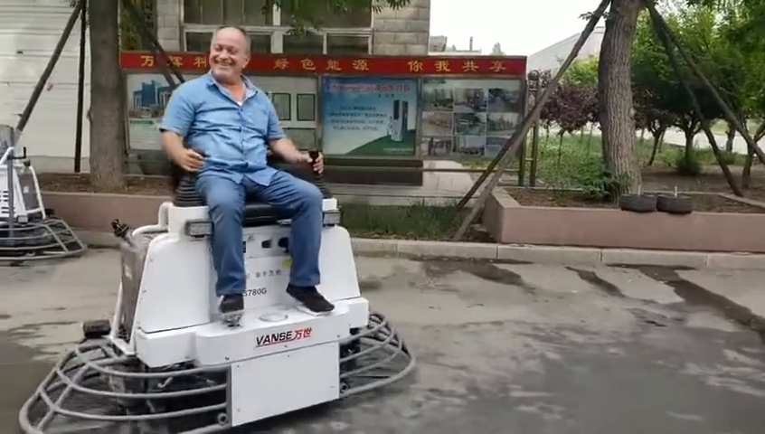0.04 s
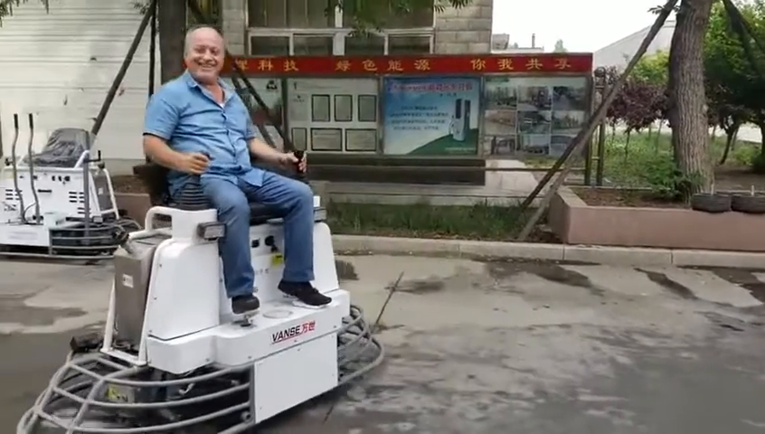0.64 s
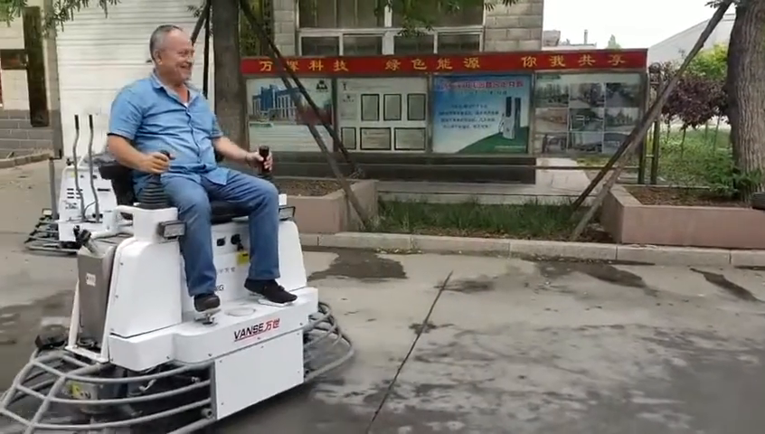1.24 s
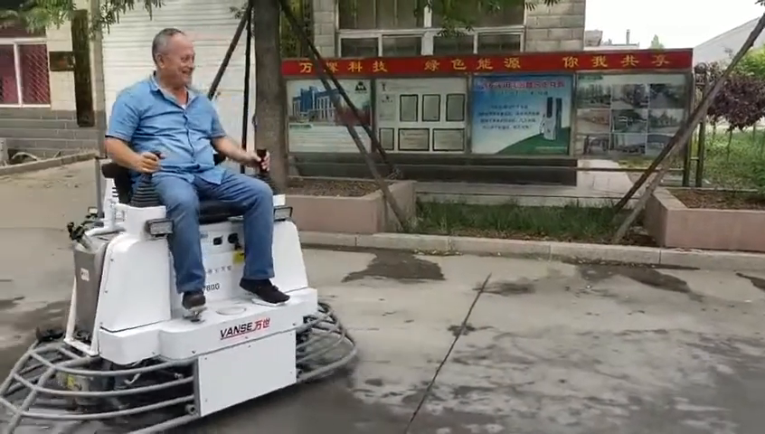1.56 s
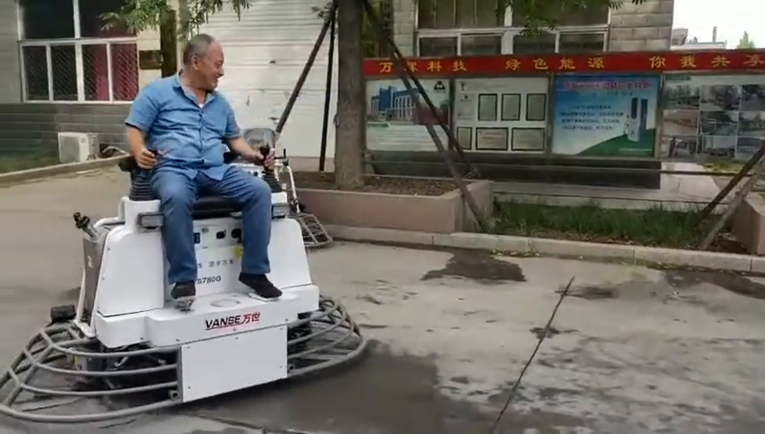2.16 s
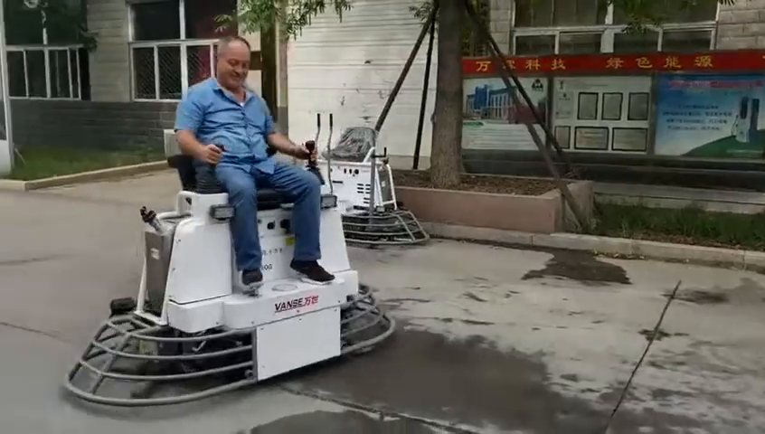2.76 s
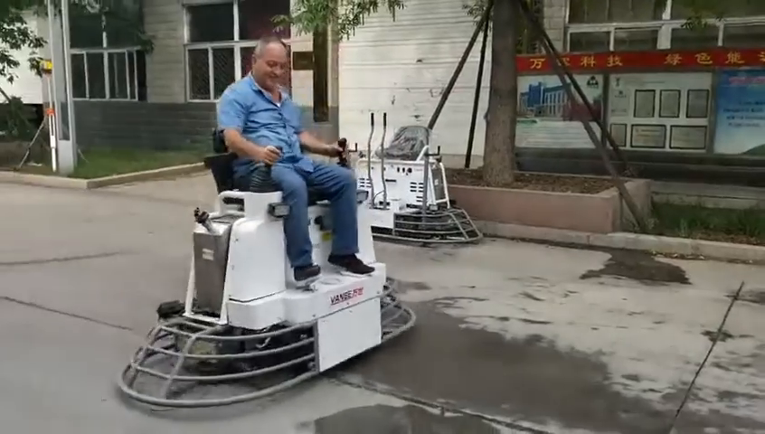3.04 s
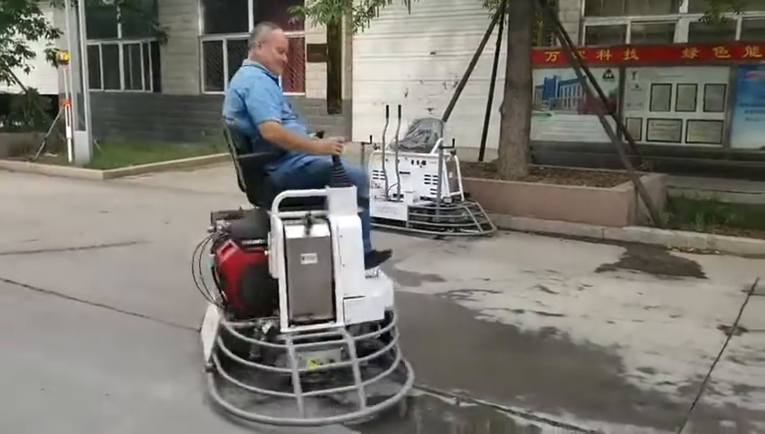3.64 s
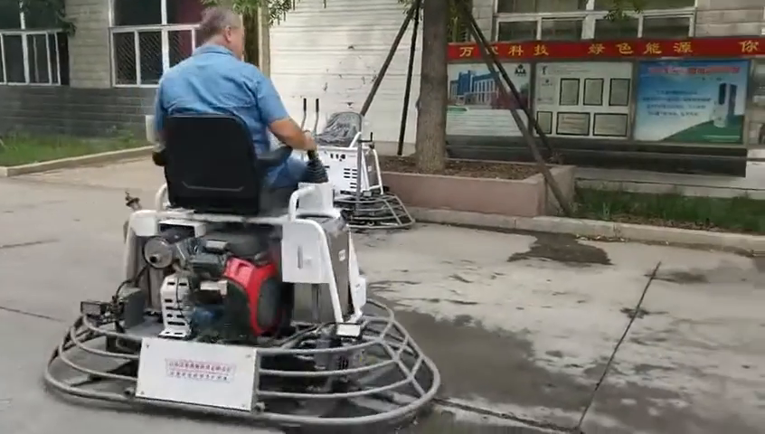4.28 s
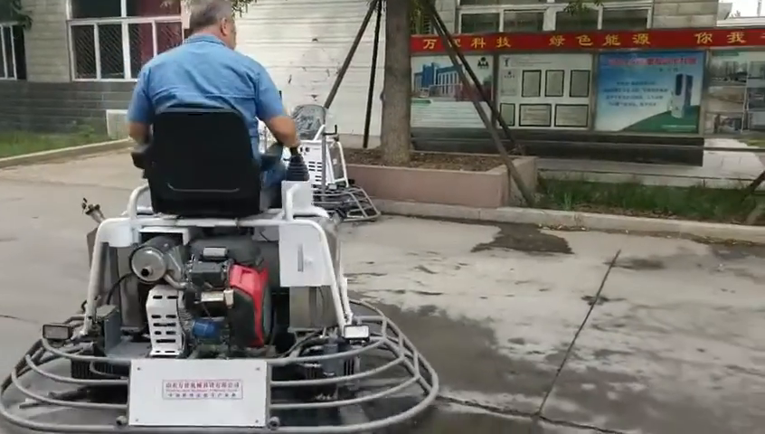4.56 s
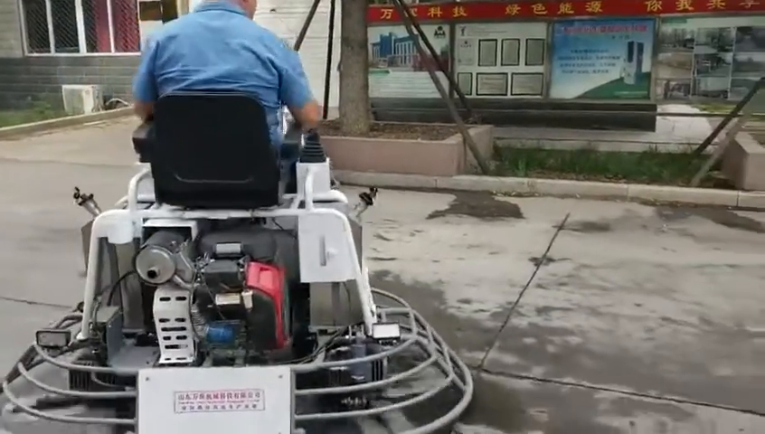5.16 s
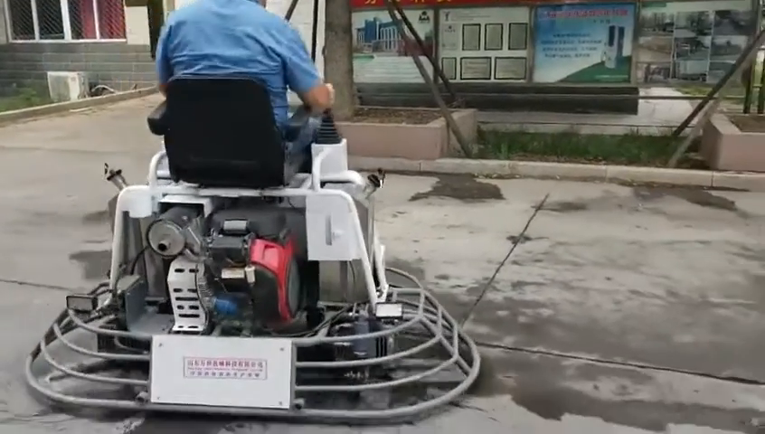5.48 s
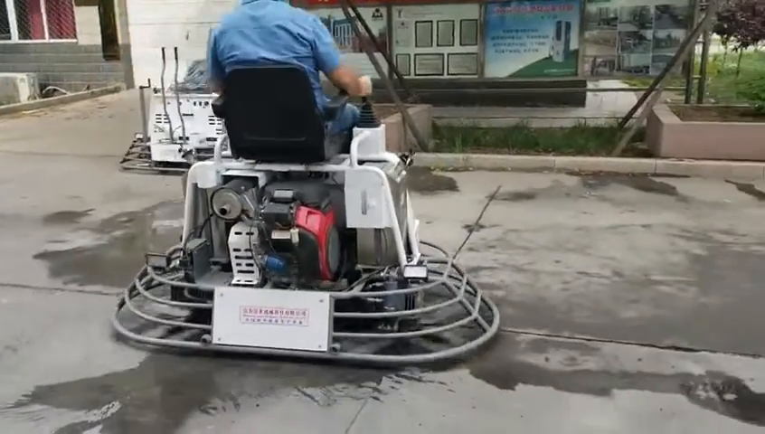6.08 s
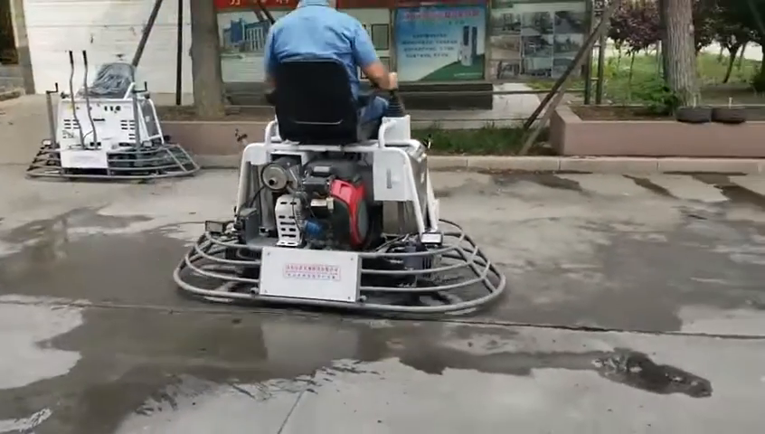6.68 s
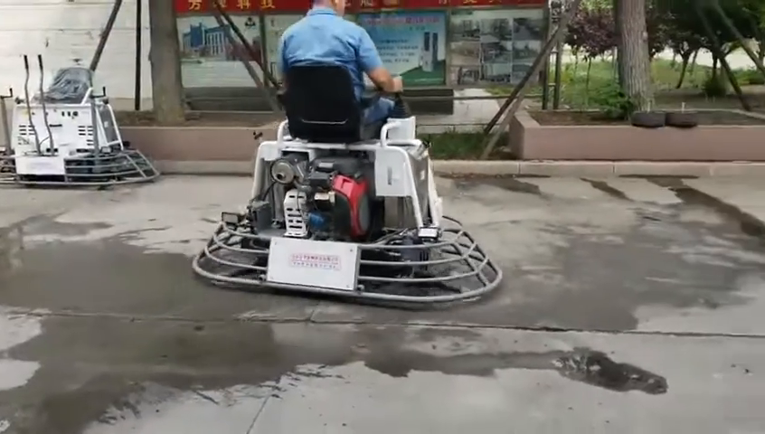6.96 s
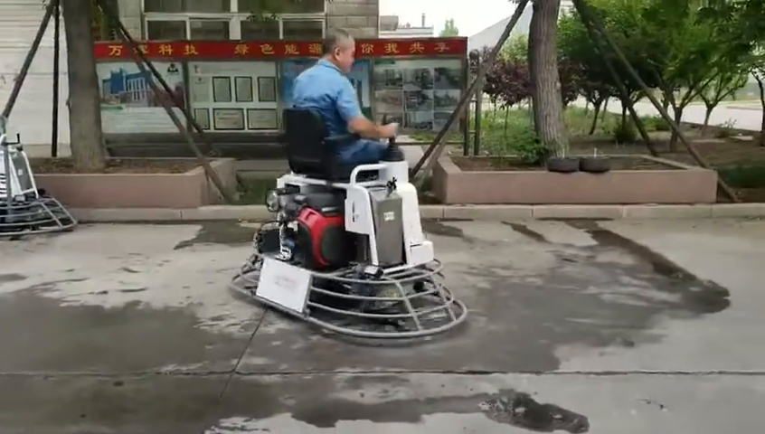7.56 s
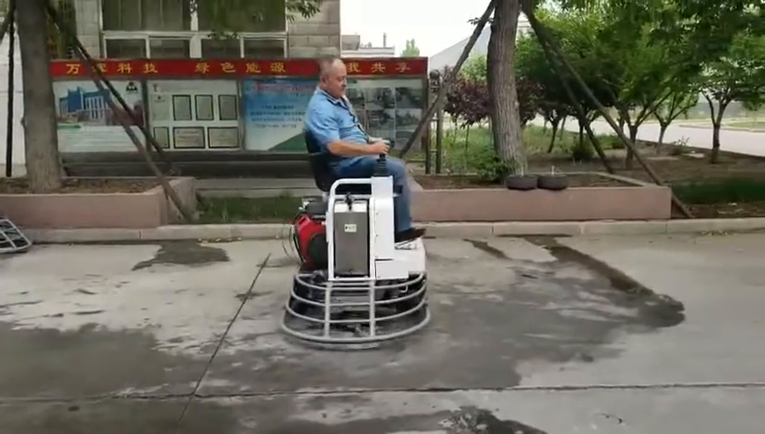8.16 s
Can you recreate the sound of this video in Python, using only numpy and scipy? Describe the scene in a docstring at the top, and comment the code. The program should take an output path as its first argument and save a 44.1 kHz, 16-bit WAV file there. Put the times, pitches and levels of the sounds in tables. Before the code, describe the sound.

Steel trowel blades grind across a concrete slab with short metallic scrapes, over a throbbing petrol engine that sags briefly under load.

```python
"""Power trowel on damp concrete

A ride-on trowel circles in a yard, a few metres away. Its V-twin petrol engine fires unevenly
into a muffler, sounding harmonics of the engine cycle that sag in pitch under load. Friction
of steel blades on the slab makes a hiss whose colour turns with the machine, and catches on
grit and joints ring the blades. Valve gear clatters behind, over a low rush of fan and frame."""
import sys
import numpy as np
from scipy import signal
from scipy.fft import rfft, irfft
from scipy.io import wavfile

SR = 44100
rng = np.random.default_rng(int(sys.argv[2]) if len(sys.argv) > 2 else 0)


def dump_mix(stems):
    """Bounce the given channels to the path in sys.argv[1] as a 16-bit WAV at rate SR."""
    frames = np.atleast_2d(stems).T  # one column per channel
    limited = np.clip(frames, -1, 1)  # hard clip at full scale
    pcm = np.round(limited * 32767).astype(np.int16)
    wavfile.write(sys.argv[1], SR, pcm)


N = 366912

FIRING_PHASES, BARK_LAG = (.545, 0.1959), 0.0883  # two cylinders, tailpipe delay; in cycles
# Muffler thud, shell drone and tailpipe bark: engine_order, relative_db
THUD_ORDERS = [(2, -2.5), (3, 0), (4, -2)]
DRONE_ORDERS = [(7, -14), (8, 0), (9, -8)]
BARK_ORDERS = [(10, -3.5), (11, -2.5), (12, -10), (13, -1.5), (14, -4), (15, -6.5), (16, -9.5), (17, -17),
               (18, -15)]
# Exhaust as the machine moves: time_s, thud_db, fifth_db, sixth_db, drone_db, bark_db, gas_db
EXHAUST_LEVELS = [(.25, -29, -25, -28, -32.5, -29, -40), (.85, -29.5, -28.5, -25.5, -25.5, -29.5, -37.5),
                  (1.3, -30, -29.5, -27.5, -29.5, -30, -33.5), (1.75, -31.5, -26, -26.5, -32.5, -29.5, -37),
                  (2.25, -31.5, -26, -31.5, -33, -32, -45), (2.75, -33.5, -27.5, -30, -31.5, -30, -45),
                  (3.25, -35.5, -34.5, -27, -34, -30.5, -44), (3.75, -32, -30, -25.5, -32.5, -34.5, -41),
                  (4.25, -34, -29, -30, -33, -42, -41), (4.75, -33, -29.5, -31, -31, -46, -47),
                  (5.15, -35, -29.5, -34, -36, -49, -45), (5.4, -36, -28.5, -30, -36, -43, -44),
                  (5.9, -36.5, -28, -28.5, -30.5, -40, -47), (6.3, -35.5, -28, -30.5, -37.5, -47, -48),
                  (6.75, -38.5, -30.5, -30, -34, -42, -40), (7.25, -36, -32, -31.5, -37, -41.5, -51),
                  (7.8, -39, -33.5, -29.5, -38, -33, -41), (8.3, -41, -31, -34, -42, -33, -43)]


def exhaust(cycle):
    """Periodic excitation: uneven firings drive a muffler at harmonics of the cycle and puff out gas."""
    thud = engine_orders(cycle, THUD_ORDERS, second_db=-3, wander_db=.7, slip_rad=.15)
    fifth = engine_orders(cycle, [(5, 0)], second_db=-3, wander_db=.3, slip_rad=.08)
    sixth = engine_orders(cycle, [(6, 0)], second_db=-3, wander_db=.3, slip_rad=.08)
    drone = engine_orders(cycle, DRONE_ORDERS, second_db=-1.5, wander_db=.5, slip_rad=.12)
    bark = engine_orders(cycle - BARK_LAG, BARK_ORDERS, second_db=-3, wander_db=1.1, slip_rad=.12)
    # The pipe's resonance lifts whichever order passes through it.
    bark = unit(bark + undb(.5) * resonate(bark, hz=257, stage_width_hz=38))
    puffs = 1 + .4 * np.cos(2 * np.pi * (cycle - np.mean(FIRING_PHASES) - BARK_LAG))
    gas = unit(puffs * resonate(rng.standard_normal(N), hz=297, stage_width_hz=207))
    parts = thud, fifth, sixth, drone, bark, gas
    return sum(undb(db) * part for db, part in zip(curves(EXHAUST_LEVELS), parts))


def engine_orders(cycle, orders, second_db, wander_db, slip_rad):
    """Superposition: two firings set each harmonic's phase; level and phase drift as the machine moves."""
    out = 0
    for order, db in orders:
        first, second = np.exp(-2j * np.pi * order * np.array(FIRING_PHASES))
        phase = 2 * np.pi * order * cycle + np.angle(first + undb(second_db) * second)
        phase += slip_rad * drift(2)
        level_db = db + wander_db * drift(2.01) + 1.05 * drift(14)
        out -= undb(level_db) * np.cos(phase)
    return unit(out)


HEADINGS_DEG = (0, 45, 90, 180)
# Hiss spectrum radiated at each of these headings: frequency_hz, relative_db
FRONT_SPECTRUM = [(710, -19), (1200, -9), (1450, -5.5), (1800, -2), (1990, -10), (2150, -2.5), (2550, 2),
                  (3000, -1.5), (3300, 1.5), (3550, -5), (3750, 0.5), (4400, 1.5), (5300, 0), (5800, -0.5),
                  (6500, -1), (7300, -2.5), (8000, -6.5), (9000, -16.5), (9600, -25)]
OBLIQUE_SPECTRUM = [(710, -26), (1250, -18), (1650, -3.5), (1990, -5), (2200, 1.5), (2420, 2.5),
                    (2720, -2.5), (3180, 2), (3490, -7), (3800, 4), (4100, -2), (4450, 3), (5000, 0.5),
                    (5550, -1), (6400, 2), (7100, -4), (7500, -6.5), (8600, -8), (9100, -16), (9600, -26)]
SIDE_SPECTRUM = [(710, -21.5), (1200, -4), (1620, 0.5), (1890, -3.5), (2150, 4), (2400, 0), (2620, -3.5),
                 (2900, 3), (3230, -5.5), (3650, 1.5), (3900, -1), (4300, 1.5), (5000, -4.5), (5500, -7),
                 (6100, -3), (7200, -9), (8100, -5), (9000, -11.5), (9600, -26.5)]
REAR_SPECTRUM = [(710, -20), (1350, -12.5), (1620, -4.5), (1980, -6), (2200, 1.5), (2480, 4), (2750, -0.5),
                 (3100, 1.5), (3450, -3.5), (3900, 1), (4250, 2), (4600, 4), (5100, 4), (5900, 1),
                 (6450, 1.5), (7300, -6), (8000, -5), (8800, -21.5), (9200, -34.5), (9600, -43.5)]


def blade_hiss(sweep, heading_shares):
    """Friction noise: blades grind grit and crack sand; directivity colours the grinding by heading."""
    grit = steel_modes(grains(per_s=5000, spread_db=0) * sweep)
    sand = unit(resonate(grains(per_s=260, spread_db=3.5), hz=6500, stage_width_hz=4500))
    views = zip(heading_shares, (FRONT_SPECTRUM, OBLIQUE_SPECTRUM, SIDE_SPECTRUM, REAR_SPECTRUM))
    grinding = sum(share * unit(colour(grit, spectrum, causal=0)) for share, spectrum in views)
    return grinding + undb(-21) * sand


def steel_modes(friction, count=56, q=50, flicker_db=6.5):
    """Modal response: resonances of the guard and blades flare in the hiss, each on its own."""
    out = friction
    for hz in np.geomspace(1500, 9300, count) * (1 + .006 * rng.standard_normal(count)):
        mode = bandpass(friction, hz, hz / q)
        out = out + undb(flicker_db * np.clip(drift(28), -1.6, 1.6)) * mode
    return unit(out)


def rotor_sizzle(sweep):
    """Level difference between the ears: the nearer rotor's bright edge hiss is heard to the left."""
    friction = grains(per_s=4300, spread_db=3) * sweep
    edge = unit(resonate(friction, hz=6600, stage_width_hz=1100))
    return edge * undb([[0], [-18]])


# A blade's low ring, its rasp and the hiss of its edge: pitch_hz, width_hz, relative_db
RING_MODES = [(690, 90, 9), (885, 115, 15), (1030, 75, 10)]
RASP_MODES = [(1700, 200, 3.1), (2450, 210, 7.5), (2790, 520, 2.9)]
EDGE_MODES = [(3815, 200, 4.5), (4490, 440, 4.5), (4900, 450, 2.5), (6210, 550, 4)]
# Hard catches on grit and joints: time_s, length_s, ring_db, rasp_db, edge_db
HARD_CATCHES = [(1.49, 0.05, -28, -46, -23), (2.122, 0.021, -22, -23, -18.5), (2.181, .025, -31, -27, -20),
                (2.999, .04, -27, -22, -29), (3.244, .012, -18.5, -21, -34),
                (3.629, 0.042, -23.5, -22, -26), (3.693, 0.039, -39, -24, -21.5),
                (3.78, 0.028, -24, -16, -20), (3.991, 0.033, -26, -14.5, -24),
                (4.085, 0.037, -19.5, -16.5, -19.5), (4.202, 0.03, -23, -30, -24),
                (4.484, 0.022, -20, -20, -34), (4.58, .05, -27, -23.5, -33),
                (4.629, 0.0067, -16.5, -20.5, -24), (4.83, 0.023, -33, -30, -28),
                (4.93, .025, -26, -25, -24), (5.066, 0.009, -16.5, -17, -25), (5.145, 0.03, -32, -29, -19),
                (5.194, 0.065, -26, -22, -23), (5.268, 0.06, -27, -31, -26), (5.342, 0.04, -21, -18.5, -21),
                (5.475, 0.055, -32, -20.5, -21.5), (5.603, 0.022, -20, -20, -32),
                (5.711, 0.024, -21, -18, -17.5), (5.754, .03, -28, -28, -25),
                (5.802, 0.045, -31, -21.5, -16.5), (5.854, 0.051, -23.5, -20, -25),
                (6.024, 0.0073, -20, -15.5, -40), (6.088, 0.045, -29, -37, -32),
                (6.209, 0.036, -23.5, -25, -18), (6.469, 0.02, -23.5, -19, -22),
                (6.675, 0.013, -26, -27, -24), (6.802, 0.014, -27, -31, -31), (7.033, 0.06, -30, -25, -36),
                (7.376, 0.038, -24.5, -23, -27), (7.442, 0.028, -23, -23, -36),
                (7.819, 0.013, -15, -22, -19), (7.902, 0.04, -22, -25, -24), (8.082, 0.071, -33, -32, -22),
                (8.192, 0.036, -26, -22, -22)]


def blade_catches(events, detune=.045, spread_db=2.5, tail_s=.028, tail_db=-15):
    """Transient excitation: a rough spot rings a blade, its modes varying with the point of contact."""
    t = np.arange(N) / SR
    out = np.zeros(N)
    for time_s, length_s, *levels_db in events:
        near = slice(max(int((time_s - .06) * SR), 0), int((time_s + .14) * SR))
        age = t[near] - time_s + .0045
        slope_s = length_s * np.where(age < 0, .21, .48)  # quick rise, slower fall
        swell = np.exp(-(age / slope_s) ** 2)
        power = swell + undb(2 * tail_db) * (age > 0) * np.exp(-abs(age) / tail_s)
        for modes, db in zip((RING_MODES, RASP_MODES, EDGE_MODES), levels_db):
            tuned = [(hz * (1 + detune * rng.uniform(-1.18, 1)), width_hz,
                      mode_db + spread_db * rng.standard_normal()) for hz, width_hz, mode_db in modes]
            scrape = np.sqrt(power) * grains(per_s=5000, spread_db=-.5, size=len(age))
            out[near] += undb(db) * np.sqrt(power.mean()) * unit(ring(scrape, tuned))
    return out


def blade_grazes(turns, level_db, blades, length_s=.027, jitter=.17, clearance_s=.065):
    """Blade-passing rate: each pass adds a light catch to a list, unless a hard catch is close."""
    passes = blades * turns
    count = int(passes[-1])
    chance = rng.standard_normal((256, 5))[:count]
    timing, strength, tint = chance[:, 0], chance[:, 1], chance[:, 2:]
    samples = np.searchsorted(passes, np.arange(count) + .5 + jitter * timing).clip(0, N - 1)
    strength_db = level_db[samples] - 2 * np.minimum(strength, 2)
    colour_db = np.array([-4, -2, -1]) + (9 * tint).clip(-2, 2)  # ring, rasp, edge
    levels_db = strength_db[:, None] + colour_db
    hard_s = np.array(HARD_CATCHES)[:, 0]
    return [(time_s, length_s, *row) for time_s, row in zip(samples / SR, levels_db)
            if abs(hard_s - time_s).min() > clearance_s]


# Crankcase and covers: pitch_hz, width_hz, relative_db
CASING_MODES = [(676, 110, -4), (885, 270, 6.5), (918, 100, 0), (1605, 170, -3)]


def valve_clatter(cycle):
    """Forced vibration: valve gear strikes the casing in a pattern that partly repeats every cycle."""
    pattern = rng.standard_normal(2048)
    repeating = pattern[(cycle % 1 * len(pattern)).astype(int)]
    blows = repeating + grains(per_s=1500, spread_db=3)
    throb = 1 + .074 * np.cos(2 * np.pi * (cycle - .22))
    blows *= throb * undb(2 * drift(25))
    return unit(ring(blows, CASING_MODES))


# Low rush of fan and frame: frequency_hz, relative_db
FAN_SPECTRUM = [(20, -12), (60, -8.5), (150, -2.5), (260, -4.5), (380, -3), (500, -12.5), (700, -1),
                (1200, -8.5), (1700, -11), (2600, -48.5)]


def fan_rush():
    """Broadband noise: fan and frame give a low rush without pitch."""
    return unit(colour(rng.standard_normal(N), FAN_SPECTRUM))


def hollow_notch(x, depth=.75):
    """Band rejection: a fixed notch near 2 kHz gives the machine noise a hollow colour."""
    return x - depth * bandpass(x, hz=1985, width_hz=175)


# Side signal relative to mid: frequency_hz, level_db
SIDE_OVER_MID = [(60, -32.5), (190, -38), (330, -14.5), (580, -10.5), (900, -15), (1300, -0.5),
                 (1700, -10.5), (2400, -11.5), (3210, 0.5), (5670, 0), (10000, 1)]


def stereo(mid, other):
    """Decorrelation: bass is alike in both channels, treble is not."""
    side = colour(other, SIDE_OVER_MID)
    return np.array([mid + side, mid - side])


def ring(x, modes):
    """Modal superposition: a body responds as the sum of a few broad resonances."""
    return sum(undb(db) * resonate(x, hz, 1.41 * width_hz) for hz, width_hz, db in modes)


def resonate(x, hz, stage_width_hz):
    """Two resonators in cascade give a narrower peak with steeper skirts."""
    return bandpass(bandpass(x, hz, stage_width_hz), hz, stage_width_hz)


def bandpass(x, hz, width_hz):
    """Second-order resonance, gain 1 at its centre."""
    return signal.lfilter(*signal.iirpeak(hz, hz / width_hz, fs=SR), x)


def colour(x, spectrum, causal=1, size=8192):
    """Spectral shaping: minimum phase at causal=1; zero phase at 0, so a click swells before it rings."""
    hz, db = np.transpose(spectrum)
    bins_hz = np.maximum(np.fft.rfftfreq(size, 1 / SR), 1)
    gain = undb(np.interp(np.log(bins_hz), np.log(hz), db))
    cepstrum = irfft(np.log(gain))
    cepstrum[1:size // 2] *= 1 + causal
    cepstrum[size // 2 + 1:] *= 1 - causal
    response = np.roll(irfft(np.exp(rfft(cepstrum))), size // 2)
    return signal.oaconvolve(x, response)[size // 2:size // 2 + N]


def grains(per_s, spread_db, size=N):
    """Shot noise: tiny clicks at random times, scattered in size by spread_db."""
    present = rng.random(size) < per_s / SR
    sizes = undb(spread_db * np.minimum(rng.exponential(size=size), 3))
    return unit(present * sizes * rng.choice([-1, 1], size))


def drift(per_s):
    """Random modulation with a spread near 1."""
    knots = rng.standard_normal(2048)
    return np.sqrt(3 / 2) * np.interp(np.arange(N) / SR * per_s, np.arange(len(knots)), knots)


def curves(table):
    """Linear interpolation of each column of a timed table, sample by sample."""
    time_s, *columns = np.transpose(table)
    return [np.interp(np.arange(N) / SR, time_s, column) for column in columns]


def undb(db):
    """Decibels to gain."""
    return 10 ** (np.asarray(db) / 20)


def unit(x):
    """Scale to rms 1."""
    return x / np.sqrt(np.mean(x ** 2))


# Four-stroke cycle rate, sagging under load: time_s, rate_hz
ENGINE_SPEED = [(0.1, 24.0), (0.69, 23.3), (1.15, 23.3), (2.01, 24.1), (3.47, 22.5), (4.18, 23.2),
                (4.41, 22.4), (4.61, 23.1), (4.75, 22.7), (5.04, 21.5), (5.2, 19.4), (5.52, 20.1),
                (5.75, 19.2), (6.0, 20.9), (6.21, 22.0), (6.55, 20.3), (6.84, 21.7), (7.48, 22.1),
                (7.84, 23.4), (8.28, 23.0)]
# Base levels of the blade hiss and of the clatter, rush and grazes: time_s, hiss_db, mechanical_db
NOISE_LEVELS = [(0.1, -19.5, -26.5), (1.3, -21, -28), (2.15, -19.5, -27.5), (2.33, -22.5, -30),
                (2.7, -22.5, -32), (3.2, -21, -28), (3.6, -19.5, -26.5), (4.0, -19.5, -23),
                (4.3, -18.8, -26.5), (4.6, -19.5, -27), (4.95, -19.5, -28), (5.2, -20, -28),
                (5.71, -19.5, -25.5), (6.09, -20, -26.5), (6.5, -22, -29.5), (7.14, -22.5, -27.5),
                (7.52, -24, -28), (8.25, -22, -29.5)]
# How far the machine is turned from the listener: time_s, heading_deg, left_minus_right_db
ORIENTATION = [(0, 4, 0.5), (1.9, -5, 1), (2.45, 43, 0.5), (3.3, 52, 0), (3.65, 67, 0), (4.0, 157, -0.5),
               (4.5, 188, 0.3), (6.1, 175, 0), (6.8, 122, 0), (7.4, 92, 0), (8.32, 92, 0)]
CYCLES_PER_TURN, BLADES_PER_ROTOR = 11.1, 4


def scene():
    """Mechanical coupling: one engine speed paces the exhaust, the valve gear and the rotors."""
    cycle_hz, = curves(ENGINE_SPEED)
    hiss_db, mechanical_db = curves(NOISE_LEVELS)
    heading_deg, pan_db = curves(ORIENTATION)
    heading_shares = [np.interp(heading_deg, HEADINGS_DEG, row) for row in np.eye(len(HEADINGS_DEG))]
    facing = heading_shares[0]
    cycle = np.cumsum(cycle_hz) / SR
    turns = cycle / CYCLES_PER_TURN
    rotor_rad = 2 * np.pi * turns
    ripple_db = .13 * np.sin(rotor_rad) + .17 * np.sin(BLADES_PER_ROTOR * rotor_rad)
    sweep = undb(ripple_db + .5 * drift(22) + .5 * drift(140))
    events = HARD_CATCHES + blade_grazes(turns, mechanical_db - 5 * facing, BLADES_PER_ROTOR)
    mid, other = (hollow_notch(undb(mechanical_db - 3.5) * valve_clatter(cycle)
                               + undb(mechanical_db - 2.5) * fan_rush()
                               + undb(hiss_db) * blade_hiss(sweep, heading_shares)
                               + blade_catches(events)) for _ in range(2))
    machine = stereo(mid, other) + facing * undb(hiss_db - 3) * rotor_sizzle(sweep)
    return exhaust(cycle) + machine * undb(np.array([pan_db, -pan_db]) / 2)


def record(dry):
    """Soft saturation rounds the highest peaks; a low-pass filter cuts the top octave."""
    ceiling, cutoff_hz = .78, 9700
    rounded = dry / (1 + (dry / ceiling) ** 6) ** (1 / 6)
    return signal.sosfilt(signal.ellip(10, .2, 80, cutoff_hz, fs=SR, output="sos"), rounded)


dry = scene()
out = record(dry)
dump_mix(out)
```